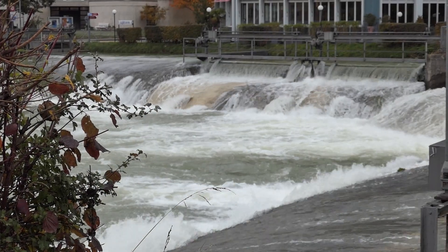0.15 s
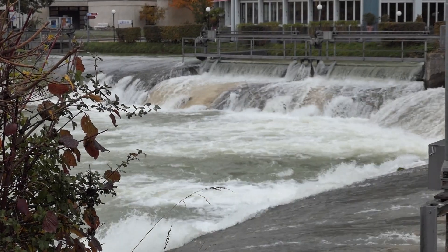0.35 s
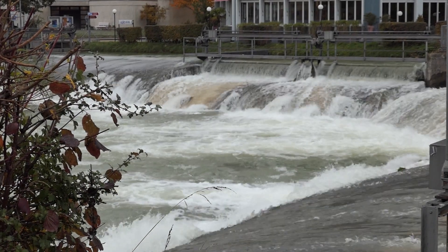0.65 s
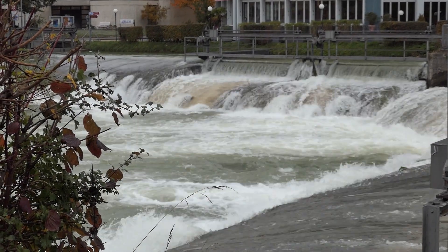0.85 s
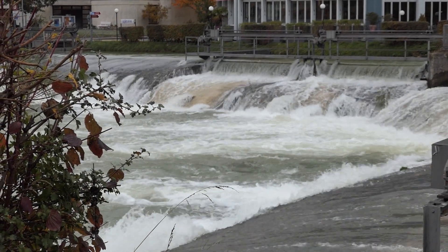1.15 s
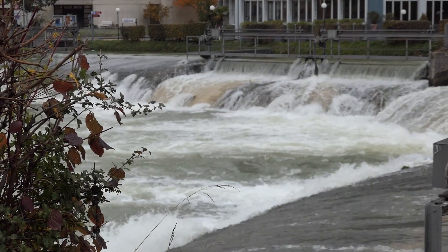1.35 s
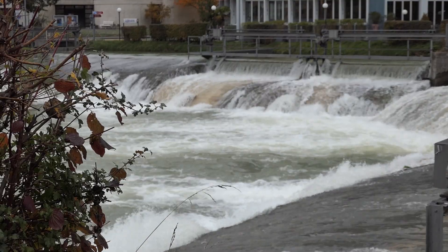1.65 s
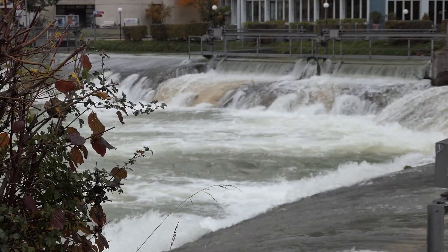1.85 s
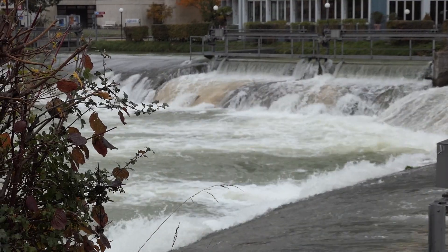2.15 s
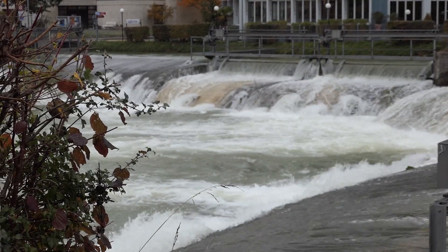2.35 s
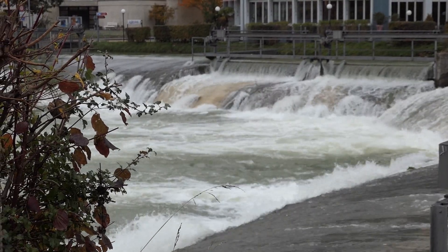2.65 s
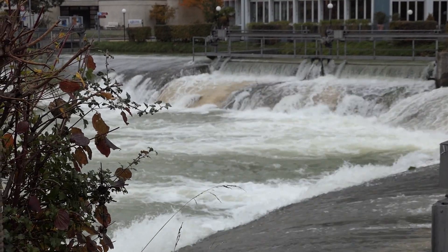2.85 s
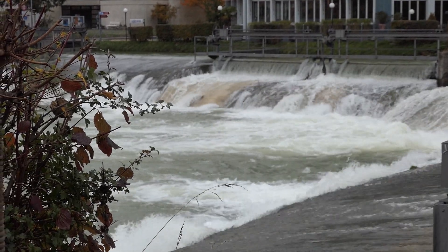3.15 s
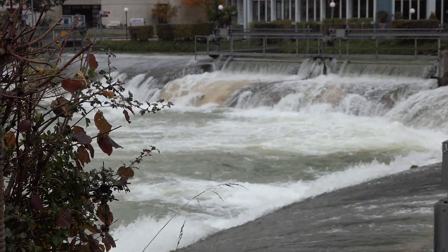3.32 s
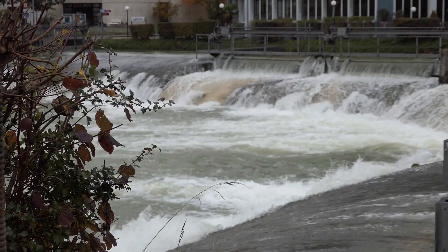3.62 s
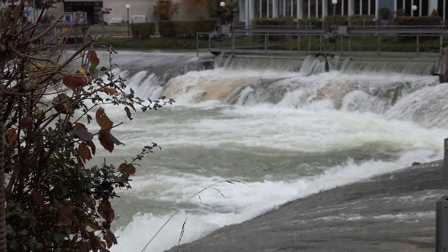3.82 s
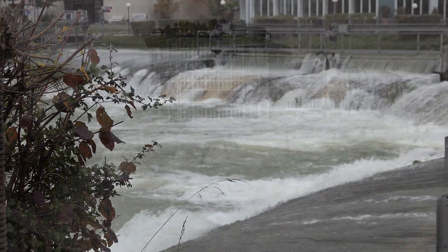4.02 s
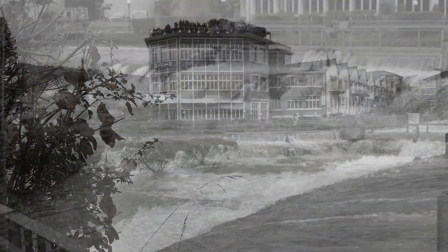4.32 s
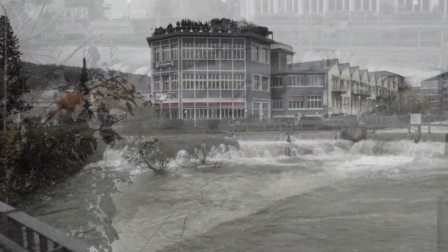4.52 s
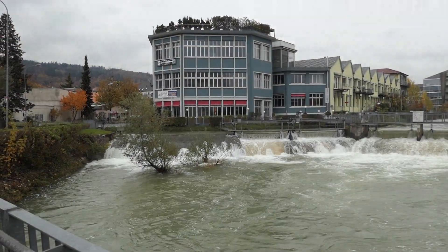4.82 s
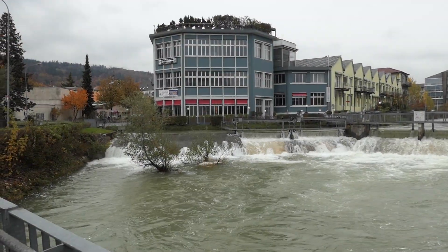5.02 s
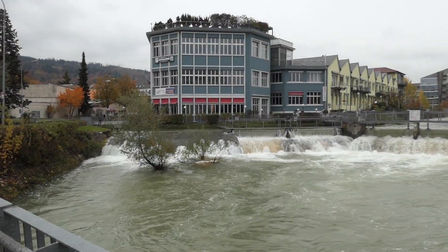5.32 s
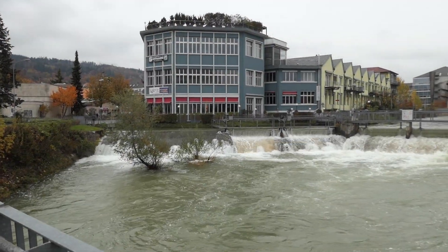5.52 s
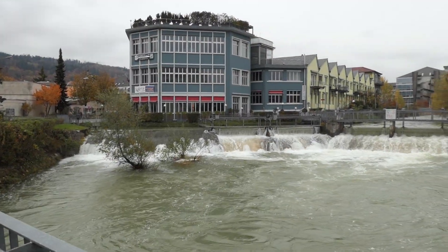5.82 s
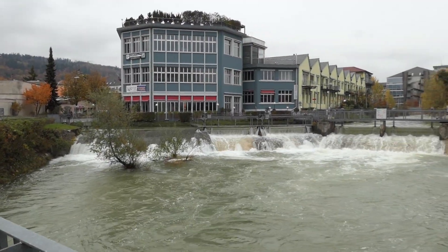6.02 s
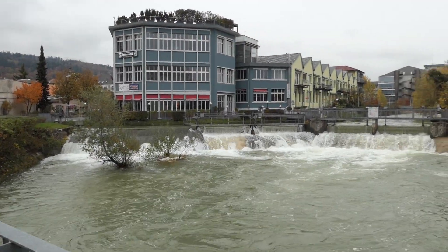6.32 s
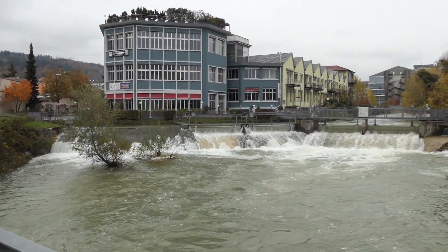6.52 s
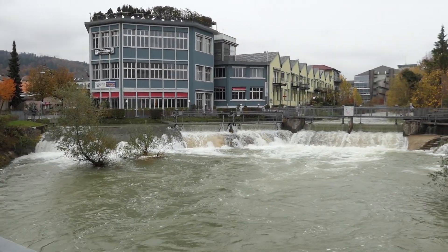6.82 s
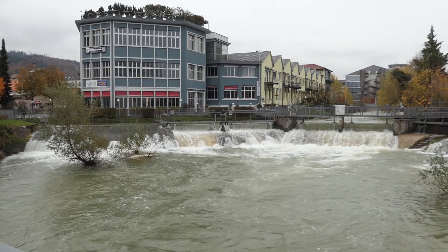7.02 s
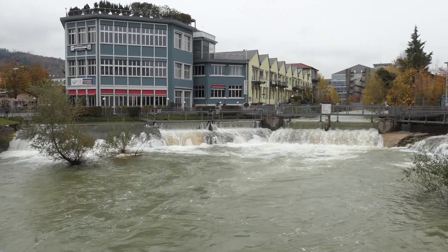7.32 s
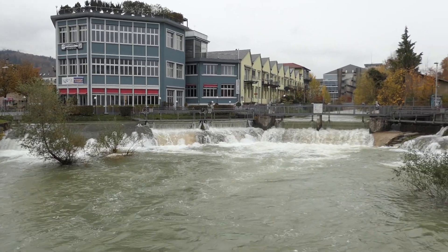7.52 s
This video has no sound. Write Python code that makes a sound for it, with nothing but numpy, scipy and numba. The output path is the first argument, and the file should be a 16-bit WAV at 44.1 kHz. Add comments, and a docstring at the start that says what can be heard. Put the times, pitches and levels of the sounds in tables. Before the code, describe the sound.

A high river pours over a low weir outdoors, close to the microphone, with a deep, surging boom under steady splashing and fizzing foam. About four seconds in come a faint bird peep and a tiny tick, then the sound cuts to silence for a moment. The river returns from across the pool, its rush gently swelling and easing, slightly to the right.

```python
"""A river in spate pours over a low weir in a town, in stereo. We open beside the fall: plunging water
makes big air pockets boom, splashes shed swarms of bubbles, foam fizzes. At 4.2 s a small bird peeps
once and something ticks, then a cut drops everything into 0.3 s of silence. The river returns from
across the pool below the weir, its splash swelling and easing while the boom slowly fades."""
import sys
import numpy as np
from scipy import signal
from scipy.fft import rfft, irfft
from scipy.io import wavfile
from numba import njit

SR = 44100
rng = np.random.default_rng(int(sys.argv[2]) if len(sys.argv) > 2 else 0)


def unload_audio(sound):
    """Save the sound as a 16-bit wav file, at the path given as the first command line argument."""
    columns = np.transpose(np.atleast_2d(sound))
    # keep every value between -1 and 1, then stretch to whole-number steps
    steps = np.round(np.clip(columns, -1, 1) * 32767)
    wavfile.write(sys.argv[1], SR, steps.astype(np.int16))


N = 338247
T = np.arange(N) / SR
HZ = np.maximum(np.arange(N // 2 + 1) * SR / N, 1)


# Tone of the water beside the fall. Each row: frequency in Hz, relative level in dB.
WEIR_TONE = [(30, -34), (45, -36.5), (66, -19.5), (100, -11), (135, -5.5), (175, -4.5), (225, -1),
             (265, 0.4), (335, -2), (460, -8.5), (600, -8), (850, -9.5), (1000, -12.5), (1200, -12),
             (1400, -15), (1750, -13.5), (2100, -17), (2550, -16), (3800, -22.5), (4700, -29),
             (5950, -36.5), (6500, -35.5), (8100, -41.5), (9000, -37.5), (10000, -37), (13000, -39.5),
             (15500, -47)]
# Its stereo image. Each row: frequency in Hz, left minus right in dB, likeness of the two sides
# from 0 to 1, phase lead of the left in radians.
WEIR_IMAGE = [(35, -2.3, 0.5, 0.07), (75, -3.5, 0.97, 0.04), (270, -2.0, 0.987, 0.11),
              (480, -2.4, 0.9, 0.0), (750, -2.1, 0.89, 0.04), (1000, -2.2, 0.8, 0.15),
              (1400, -2.5, 0.69, 0.22), (1900, -0.8, 0.84, 0.2), (2600, -0.0, 0.9, 0.22),
              (3600, 0.2, 0.87, 0.18), (4400, -0.4, 0.69, 0.22), (5400, -0.1, 0.21, 0.65),
              (6300, 0.5, 0.33, 0.03), (7200, 0.4, 0.76, 0.0), (11000, -0.1, 0.8, -0.0),
              (15000, -0.8, 0.92, 0.0)]
# Slow surges of the deep plunge. Each row: time in seconds, level in dB.
WEIR_SURGES = [(0, -22), (0.22, -21), (0.55, -22.5), (1.15, -22), (1.45, -21.5), (2.0, -21.5),
               (2.75, -21.8), (3.55, -21.5), (3.72, -23), (3.9, -21), (4.15, -23), (4.3, -23)]


def weir():
    """Beside the fall: a heavy boom surges under steady foam, drifting from the right to the middle."""
    ahead, around = (whitewater(bubble_db=-8, cycles=14.2, scatter_db=1.5, drop_db=-14,
                                swell_db=.27, flicker_db=.6) for _ in range(2))
    boom_db = np.interp(T, *np.transpose(WEIR_SURGES))
    water = place_water(ahead, around, WEIR_TONE, WEIR_IMAGE, boom_db, splash_db=-24)
    pan_db = -.5 + .29 * T  # left minus right, on top of the image
    return water * undb(np.array([pan_db, -pan_db]) / 2)


# Tone of the water from across the pool. Each row: frequency in Hz, relative level in dB.
POOL_TONE = [(30, -39), (45, -38), (66, -23), (100, -12), (135, -8.2), (230, -0.1), (310, -0.4), (420, -3),
             (520, -6), (690, -9.5), (950, -9), (1200, -9.5), (1650, -9), (2080, -15.7), (2700, -13.4),
             (3400, -18), (3750, -21.4), (4400, -22.5), (5000, -25.8), (5700, -33), (6600, -34.5),
             (7800, -38.2), (10000, -36.7), (13000, -41.5), (15200, -49)]
# Its stereo image. Each row: frequency in Hz, left minus right in dB, likeness of the two sides
# from 0 to 1, phase lead of the left in radians.
POOL_IMAGE = [(45, -3.4, 0.64, 0.05), (95, -3.9, 0.9, 0.08), (300, -1.7, 0.985, 0.08),
              (500, -3.5, 0.94, -0.2), (680, -5.1, 0.9, -0.08), (900, -3.9, 0.89, -0.14),
              (1150, -6.2, 0.85, -0.89), (1400, -8.3, 0.74, -1.76), (1650, -3.7, 0.81, -1.94),
              (1900, 2.5, 0.63, -1.19), (2150, 4.5, 0.65, -0.43), (2700, 1.6, 0.85, 0.01),
              (3500, 0.4, 0.8, 0.25), (4300, 0.3, 0.74, 0.18), (5400, -0.5, 0.2, -0.13),
              (6500, 0.3, 0.37, 0.13), (8000, 0.3, 0.43, -0.01), (10000, 0.5, 0.65, -0.03),
              (12000, -0.4, 0.81, -0.0), (15000, -0.2, 0.9, 0.01)]
# The splash swelling and easing. Each row: time in seconds, level in dB.
POOL_SWELLS = [(4.7, -23.8), (4.95, -24), (5.15, -23), (5.55, -24.5), (5.92, -23.5), (6.02, -24),
               (6.12, -22.5), (6.25, -23.8), (6.6, -23.5), (7.1, -24.4), (7.45, -24.5), (7.6, -24)]


def pool(start_s):
    """Across the pool: a gently swelling rush that leans right, the boom of the plunge slowly fading."""
    ahead, around = (whitewater(bubble_db=-9, cycles=12.4, scatter_db=2, drop_db=-14.5,
                                swell_db=.3, flicker_db=.83) for _ in range(2))
    boom_db = -22 - .4 * (T - start_s)
    splash_db = np.interp(T, *np.transpose(POOL_SWELLS))
    return place_water(ahead, around, POOL_TONE, POOL_IMAGE, boom_db, splash_db)


def whitewater(bubble_db, cycles, scatter_db, drop_db, swell_db, flicker_db):
    """The rush layered with nearer bubbles and a few longer-ringing drops, as a spectrum."""
    swarm = undb(bubble_db) * bubbles(count=45000, cycles=cycles, scatter_db=scatter_db)
    drops = undb(drop_db) * bubbles(count=3000, cycles=70, scatter_db=2.5)
    return rfft(unit(rush(swell_db, flicker_db) + swarm + drops))


def rush(swell_db, flicker_db):
    """Countless splashes merge into a bed of noise whose octaves swell together and flicker alone."""
    noise = rfft(rng.standard_normal(N))
    swell = drift(rate_hz=4.6)
    out = 0
    for octave in range(5, 15):  # centres from 32 Hz to 16 kHz
        band = np.maximum(1 - np.abs(np.log2(HZ) - octave), 0)
        level_db = swell_db * swell + flicker_db * drift(rate_hz=15.5)
        out = out + irfft(noise * band, N) * undb(level_db)
    return unit(out)


def bubbles(count, cycles, scatter_db):
    """A swarm from big booming air pockets to fine fizz, the small bubbles more numerous."""
    position, smallness, life, chance = rng.random((count, 4)).T
    hz = (7 + 118 * smallness) ** 2
    accent_db = -scatter_db * np.log(np.maximum(chance, 1 / 500))  # a few stand out
    gain = hz ** (3 / 4) * undb(accent_db)  # the tilt keeps power per Hz even
    return unit(ring_bubbles(position, hz, cycles * (.5 + life), gain, glide=.149))


@njit
def ring_bubbles(position, hz, cycles, gain, glide):
    """Each bubble is a dying sine whose pitch climbs as it nears the surface."""
    out = np.zeros(N)
    for k in range(len(position)):
        first, length = int(position[k] * N), int(cycles[k] * SR / hz[k])
        phase = 0.
        for i in range(min(length, N - first)):
            age = i / length
            phase += 2 * np.pi * hz[k] * (1 + glide * age) / SR
            out[first + i] += gain[k] * np.exp(-5 * age) * np.sin(phase)
    return out


def place_water(ahead, around, tone, image, boom_db, splash_db, crossover_hz=500):
    """Water ahead reaches both sides alike, water around differs; boom and splash each get a fader."""
    tone_db, = across_spectrum(tone)
    pan_db, likeness, lead = across_spectrum(image)
    sides = np.array([[1], [-1]])
    pair = ahead * np.sqrt(1 + likeness) + sides * around * np.sqrt(1 - likeness)
    pair = pair * undb(tone_db + sides * pan_db / 2) * np.exp(.5j * sides * lead)
    out = 0
    for band, fader_db in ((HZ < crossover_hz, boom_db), (HZ >= crossover_hz, splash_db)):
        layer = irfft(pair * band * (HZ > 1), N)
        out = out + layer * undb(fader_db) / np.std(layer.mean(axis=0))
    return out


def bird(start_s=4.212, length_s=.095, fade_s=.018, level_db=-49.8):
    """One thin whistle that slides up and levels off, barely over the water."""
    from_hz, to_hz, rise_s = 5450, 6500, .021
    age = np.maximum(T - start_s, 0)
    hz = to_hz + (from_hz - to_hz) * np.exp(-age / rise_s)
    whistle = unit(np.sin(2 * np.pi * np.cumsum(hz) / SR))
    envelope = np.clip(np.minimum(age, length_s - age) / fade_s, 0, 1)
    return undb(level_db) * envelope * whistle


def tick(start_s=4.2952, decay_s=.0016, level_db=-31):
    """A tiny close tick: bright noise with a hard attack that dies at once."""
    age = T - start_s
    band = (HZ > 4000) * (HZ < 11800)
    crack = unit(irfft(rfft(rng.standard_normal(N)) * band, N))
    envelope = (age > 0) * np.exp(-np.abs(age) / decay_s)
    return undb(level_db) * envelope * crack


def drift(rate_hz):
    """A smooth random wander of rms 1, rolling off above the given rate."""
    smoothing = (HZ > 1) / (1 + (HZ / rate_hz) ** 4)
    return unit(irfft(rfft(rng.standard_normal(N)) * smoothing, N))


def across_spectrum(table):
    """A table's columns drawn as curves over log frequency."""
    hz, *columns = np.transpose(table)
    return [np.interp(np.log(HZ), np.log(hz), column) for column in columns]


def undb(db):
    """Decibels to gain."""
    return 10 ** (np.asarray(db) / 20)


def unit(x):
    """Scale to rms 1."""
    return x / np.sqrt(np.mean(x ** 2))


def scene():
    """Beside the fall, a hard cut to silence, then across the pool."""
    cut_s, resume_s, fade_s = 4.3515, 4.6428, .001
    weir_gate = np.clip((cut_s - T) / fade_s, 0, 1)
    pool_gate = np.clip((T - resume_s) / fade_s, 0, 1)
    return (weir() + bird() + tick()) * weir_gate + pool(resume_s) * pool_gate


def record(dry):
    """A narrow notch in the presence range and a steep cut of the very top."""
    notch_hz, width_hz, top_hz = 3000, 380, 15500
    notch = signal.iirnotch(notch_hz, notch_hz / width_hz, fs=SR)
    high_cut = signal.ellip(10, .1, 80, top_hz, fs=SR, output="sos")
    return signal.sosfilt(high_cut, signal.lfilter(*notch, dry))


dry = scene()
out = record(dry)
unload_audio(out)
```